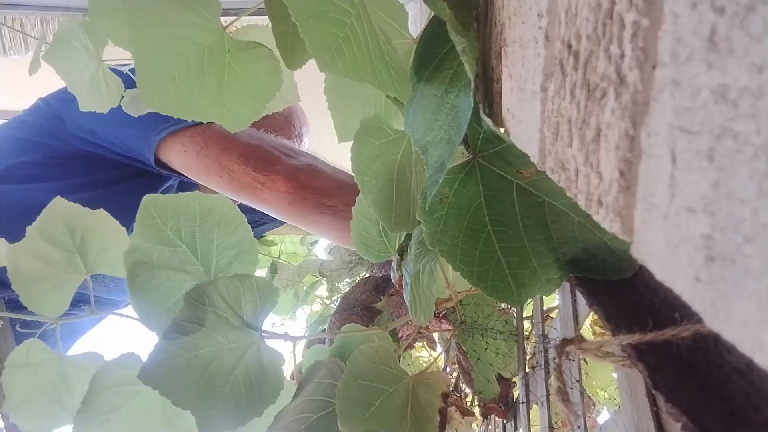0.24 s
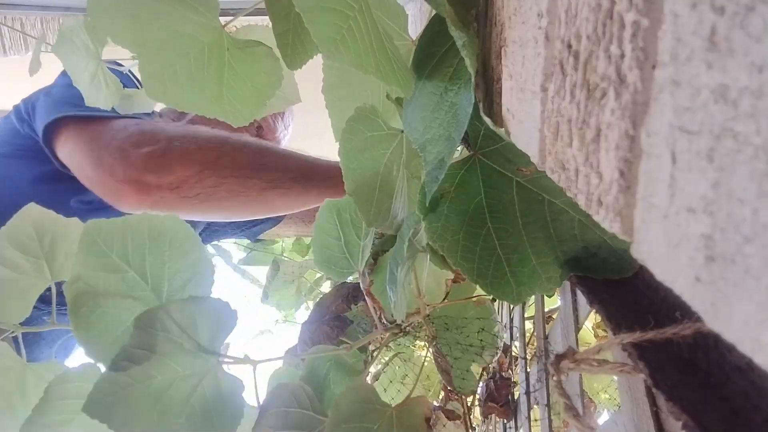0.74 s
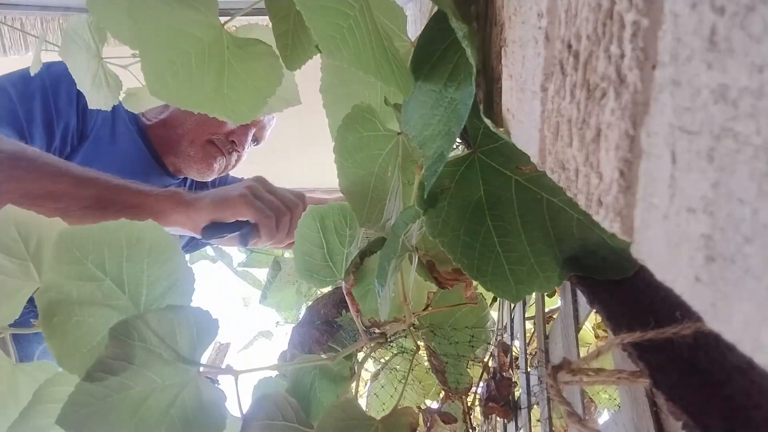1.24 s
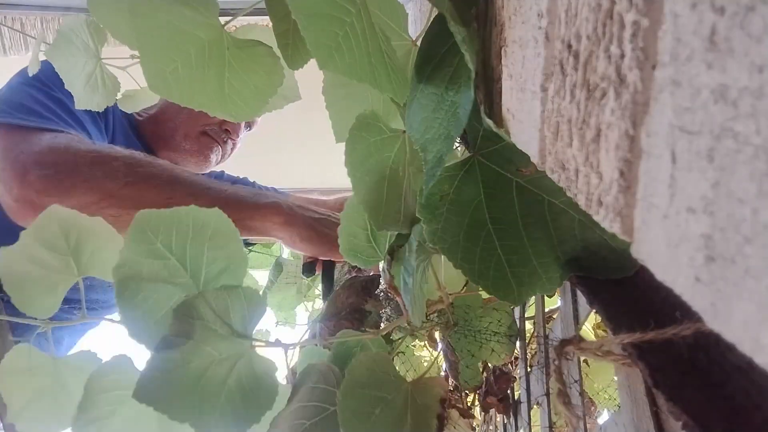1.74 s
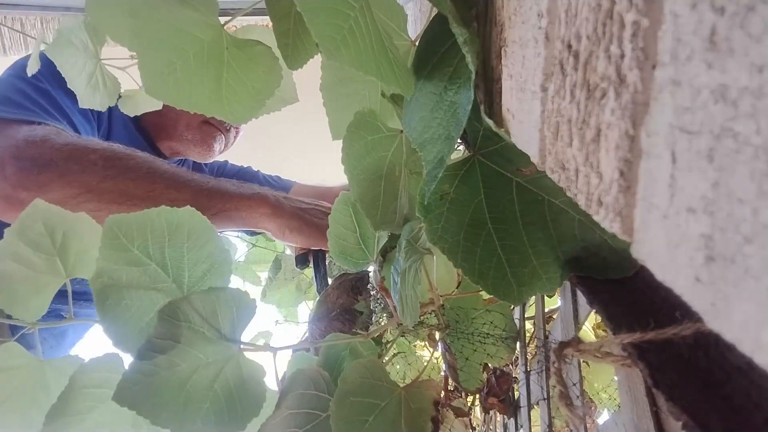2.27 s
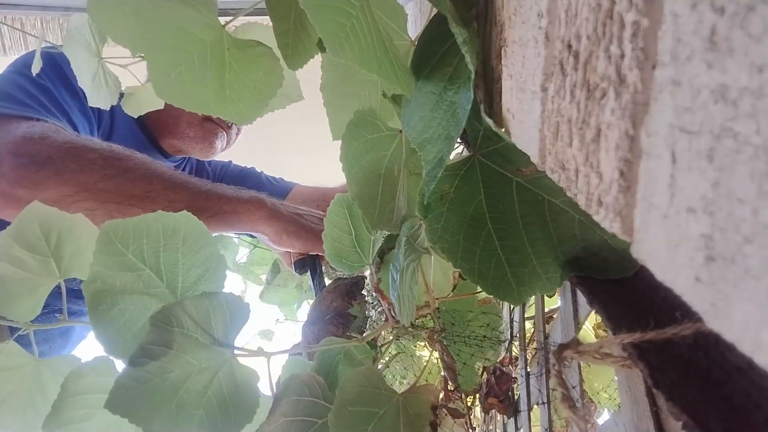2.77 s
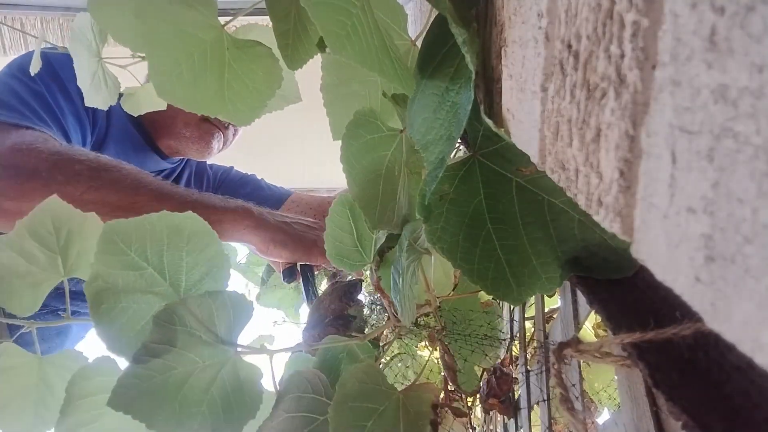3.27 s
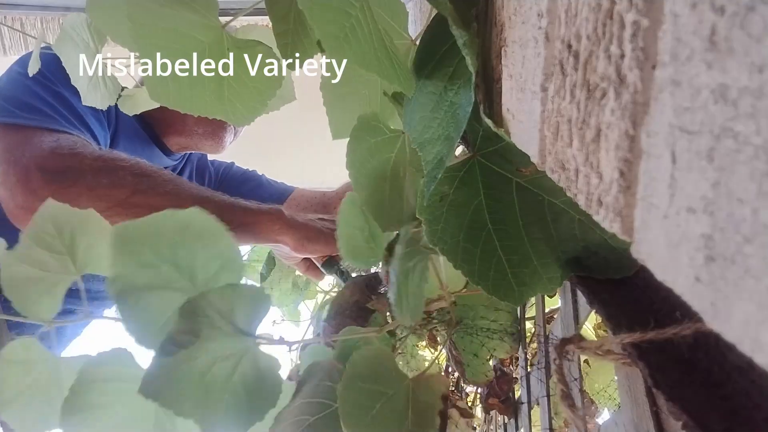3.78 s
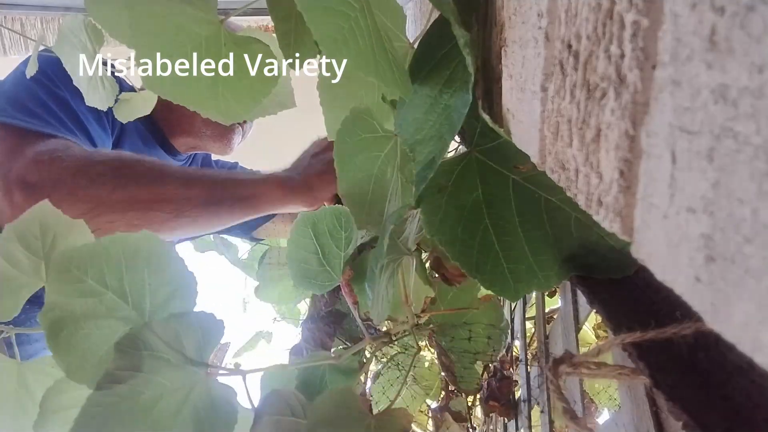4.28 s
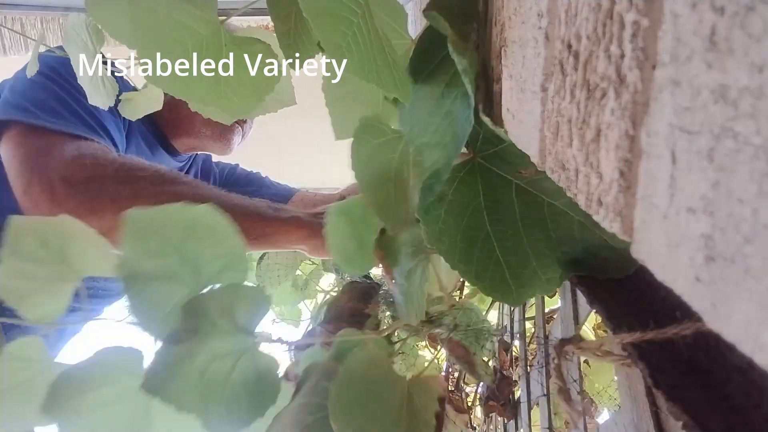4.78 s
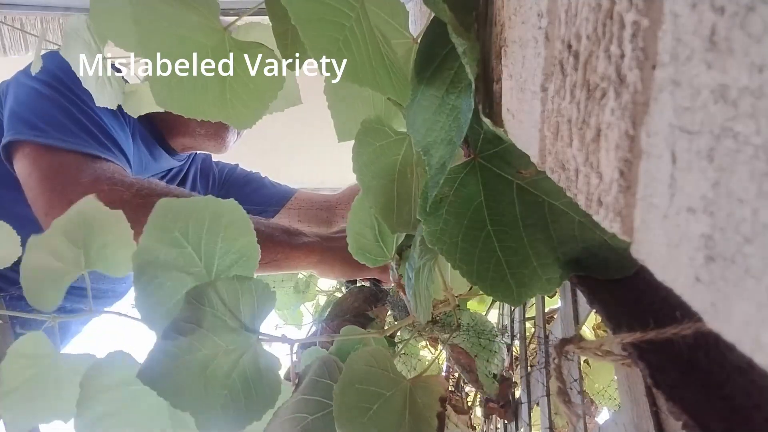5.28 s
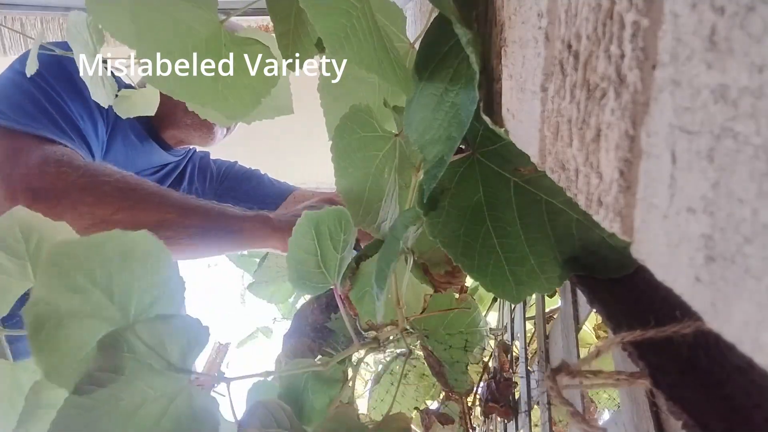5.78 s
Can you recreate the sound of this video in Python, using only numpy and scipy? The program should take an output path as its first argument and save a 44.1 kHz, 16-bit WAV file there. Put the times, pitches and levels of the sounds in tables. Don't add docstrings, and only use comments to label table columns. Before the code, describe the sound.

One sharp, crunchy snip of hand shears through a vine stem up close, then leaves rustle and twigs knock increasingly as hands push through.

```python
import sys
import numpy as np
from scipy import signal
from scipy.fft import rfft, irfft
from scipy.io import wavfile
from scipy.ndimage import uniform_filter1d

SR = 44100
rng = np.random.default_rng(int(sys.argv[2]) if len(sys.argv) > 2 else 0)


def master_out(mix):
    frames = np.transpose(np.atleast_2d(mix))
    ceiling = np.clip(frames, -1, 1)
    pcm = np.round(ceiling * 32767).astype(np.int16)
    wavfile.write(sys.argv[1], SR, pcm)


def invert_db(level):
    return 10 ** (np.asarray(level, dtype=float) / 20)


N = 265570
T = np.arange(N) / SR
HZ = np.fft.rfftfreq(N, 1 / SR) + 1
SPLIT_HZ = 7660

# frequency in Hz, density in dB per Hz.
LEAF = [(1500, -45), (2400, -16), (3100, -8), (4100, -7), (5200, -8.5), (7300, -7), (10500, -3),
        (13000, -2.5), (14300, -2)]
# frequency in Hz, density in dB per Hz.
CANE = [(300, -4.5), (520, -5.5), (750, 0.5), (1400, -3), (2300, -2), (3200, -10), (4200, -13), (5500, -50)]


def unit(x):
    return x / np.sqrt(np.mean(x ** 2))


def curve(s, db, rise_ms, fall_ms):
    late_ms = 1000 * (T - s[:, None])
    rise_ms, fall_ms = np.maximum(rise_ms, 2)[:, None], np.maximum(fall_ms, 2)[:, None]
    span_ms = np.where(late_ms < 0, -rise_ms, fall_ms)
    stroke_db = db[:, None] - 20 * late_ms / span_ms
    return np.sqrt(np.sum(invert_db(2 * stroke_db), axis=0))


def over_hz(rows):
    hz, value = np.transpose(rows)
    return np.interp(np.log(HZ), np.log(hz), value)


def ports(gain, grain_db=0., lean_db=0., likeness=None):
    # frequency in Hz, left-right likeness from 0 to 1.
    near_likeness = [(25, 0.1), (60, 1), (250, 0.82), (600, 1), (1200, 0.2), (3000, 0.01), (14000, 0)]
    like = np.clip(over_hz(near_likeness if likeness is None else likeness), 0, .99)
    grains = invert_db(np.minimum(grain_db * rng.exponential(size=N), 17))
    a, b = rfft(rng.standard_normal((2, N)) * grains)
    mid, side = a * np.sqrt(1 + like), b * np.sqrt(1 - like)
    left = (mid + side) * invert_db(lean_db / 2)
    right = (mid - side) * invert_db(-lean_db / 2)
    return unit(irfft(np.array([left, right]) * gain, N))


def walk(rate):
    k = int(SR / rate)
    held = np.repeat(rng.standard_normal(N // k + 1), k)
    return uniform_filter1d(uniform_filter1d(held, k), k)[:N]


def fade(t, t60, rise_s):
    t = np.maximum(t, 0)
    return (1 - np.exp(-t / rise_s)) * np.exp(-np.log(1000) * t / max(t60, .005))


def ring(t, hz, t60, phase=0.):
    return fade(t, t60, 0.24 / hz) * np.sin(2 * np.pi * hz * t + phase)


def sides(pan_db):
    return invert_db(np.array([[pan_db], [-pan_db]]) / 2)


def after(s):
    return slice(int(s * SR), int(s * SR) + SR // 2)


def garden():
    # frequency in Hz, density in dB per Hz.
    traffic = [(15, -35), (30, -14.5), (70, -4.5), (105, -6), (150, -12), (200, -19), (330, -19.5),
               (575, -20.5)]
    # frequency in Hz, density in dB per Hz.
    air_hiss = [(960, -31), (1200, -28), (1500, -34), (2300, -35.5), (2900, -39.5), (4700, -46),
                (10400, -41), (14300, -42.5)]
    # frequency in Hz, left-right likeness from 0 to 1.
    far_likeness = [(30, .55), (60, .91), (115, .98), (200, .86), (330, .93), (520, .78), (750, .1),
                    (1400, 0)]
    # frequency in Hz, width in Hz, level in dB.
    drone = [(119, 13, -59), (228.4, 12, -69.5), (278.8, 6, -72.5), (361.3, 14, -71), (479, 9, -74),
             (559.5, 9, -75.5)]
    air_db, patch_db, patch_rate_hz = -53, 1.6, 9

    whole = rfft(ports(invert_db(over_hz(traffic + air_hiss)), likeness=far_likeness))
    band = np.clip(np.floor(2 * np.log2(HZ / 500)), -1, 9)
    air = np.zeros((2, N))
    for k in range(-1, 10):
        flicker = invert_db(patch_db * (k >= 0) * walk(patch_rate_hz))
        air += flicker * irfft(whole * (band == k), N)
    lines = np.zeros((2, N))
    for hz, width, db in drone:
        resonance = 1 / (1 + (2 * (HZ - hz) / width) ** 2)
        lines += invert_db(db + 2.9 * walk(6.4)) * ports(resonance, likeness=far_likeness)
    return invert_db(air_db + 1.2 * walk(1.36)) * air + lines


def leaves():
    # peak time in seconds, level in dB,
    # rise over 20 dB in ms, fall over 20 dB in ms.
    brushes = [(.004, -57, 12, 160), (.43, -59, 160, 140), (2.45, -68, 30, 60), (2.54, -66, 25, 40),
               (2.67, -65, 80, 60), (3.04, -57, 30, 150), (3.3, -66, 300, 300), (3.455, -51, 25, 80),
               (.78, -61, 45, 220), (.925, -58, 22, 110), (1.27, -62, 250, 330), (1.79, -51, 70, 100),
               (1.95, -59, 300, 200), (2.06, -60, 150, 200)]
    # peak time in seconds, level in dB,
    # rise over 20 dB in ms, fall over 20 dB in ms, weight of cane in dB.
    strokes = [(2.76, -65.5, 62, 100, -4.5), (2.812, -55, 30, 91, -9.5), (3.4, -59, 40, 150, -13),
               (3.53, -56, 248, 200, -16), (3.65, -48, 118, 130, -11.5), (3.71, -55.5, 100, 200, -24),
               (3.822, -48.5, 40, 193, -13), (3.887, -50.5, 25, 116, -10), (4.142, -47, 322, 127, -12),
               (4.218, -42.5, 111, 49, -14.5), (4.329, -47, 200, 101, -11.5), (4.412, -42.5, 25, 112, -17),
               (4.447, -46, 80, 160, -17), (4.686, -58, 22, 45, -19), (4.53, -56, 60, 213, -12),
               (4.79, -56.5, 88, 99, -6.5), (4.845, -49, 60, 150, -16), (4.88, -46.5, 60, 150, -10),
               (4.94, -44.5, 100, 150, -15), (5.008, -43, 50, 100, -24), (5.072, -50, 40, 89, -24),
               (5.14, -67.5, 57, 190, -14), (5.228, -46.5, 64, 10, -9), (5.255, -59, 22, 60, -17),
               (5.31, -57, 202, 180, -7.5), (5.408, -51, 22, 100, -8.5), (5.45, -45, 31, 228, -9.5),
               (5.62, -64, 60, 150, -31), (5.71, -52, 137, 103.5, -11), (5.765, -53.5, 42, 72, -8.5),
               (5.805, -55.5, 61, 150, -17), (5.89, -64, 62, 150, 4), (5.918, -60, 19, 60, -20),
               (5.963, -57, 28, 57, -11), (6.0, -58, 60, 100, -14)]
    # frequency in Hz, density in dB per Hz.
    creak = [(100, -33), (230, -26), (380, 12.5), (520, -3), (900, -8.5)]
    brush_weight_db, hairs_db, veins_db, creak_db = -12, -3, -9.5, 2
    coarse_db, coarse_follows_weight = -2.5, 0.25
    cane_linger, canes_move_s = 3.14, 3

    rows = [(*row, brush_weight_db) for row in brushes] + strokes
    s, db, rise_ms, fall_ms, weight_db = np.transpose(rows)
    fine = curve(s, db, rise_ms, fall_ms)
    coarse = curve(s, db + coarse_db + coarse_follows_weight * weight_db, rise_ms, fall_ms)
    swish = curve(s, db + weight_db, rise_ms, cane_linger * fall_ms)

    slips = 1.7 * walk(35)
    leaf, cane = invert_db(over_hz(LEAF)), invert_db(over_hz(CANE))
    upper = 1 / (1 + (SPLIT_HZ / HZ) ** 8)
    hairs = fine * invert_db(hairs_db + slips + 1.8 * walk(130)) * ports(leaf * upper, grain_db=-1.0)
    veins = coarse * invert_db(veins_db + slips + 0.75 * walk(100)) * ports(leaf * (1 - upper), grain_db=7.5)
    dull = swish * invert_db(slips + 2.15 * walk(60)) * ports(cane, grain_db=6.0)
    frame = (T > canes_move_s) * invert_db(creak_db) * swish * ports(invert_db(over_hz(creak)))
    return invert_db(7.5) * (hairs + veins + dull) + crackle(fine, coarse, swish) + frame


def crackle(fine, coarse, swish, count=1500):
    out, t = np.zeros((2, N + 600)), np.arange(600) / SR
    for when, pitch, size, side in rng.uniform(0, 1, (count, 4)):
        i, hz = int(when * N), 700 * 18 ** pitch
        movement = swish if hz < 3000 else coarse if hz < SPLIT_HZ else fine
        strength = movement[i] * invert_db(-2.4 * np.log(1 - .97 * size))
        out[:, i:i + 600] += strength * sides(12 * (side - .5)) * ring(t, hz, 0.0083 + 9 / hz)
    return out[:, :N]


def flicks():
    # start in seconds, peak in dB, left minus right in dB.
    leaf_ticks = [(0.195, -49.5, -5), (0.753, -48, 2), (.9272, -62, 2), (1.293, -46, -8),
                  (1.3977, -42.5, -4), (1.476, -47, -3), (1.698, -47, 3), (1.735, -46, -8),
                  (1.867, -39, -6), (2.448, -51, -2), (2.5263, -53, 1), (3.076, -46, -3), (3.104, -49, -4),
                  (3.2417, -49, -6), (3.443, -62, -3), (3.7722, -43, -15), (4.78, -58, -3), (3.454, -46, 3),
                  (3.6186, -48, 2), (3.8241, -41, -2), (3.9858, -50, 0), (4.2068, -37, 0),
                  (4.4043, -43, 1.5), (4.7575, -53, 0), (4.8343, -46, 2), (4.8762, -42, 3), (5, -38, -3),
                  (5.1431, -49, -2), (5.2065, -43, 0), (5.221, -37, -2), (5.2858, -57, 0),
                  (5.405, -48, 1.5), (5.444, -36, -1.5), (5.4514, -43, -2), (5.6949, -47, -6),
                  (5.9144, -48, 1), (5.9618, -43, -2), (2.5383, -53, 0), (3.033, -49, 2)]
    # start in seconds, peak in dB, twig mode in Hz, left minus right in dB.
    edge_flicks = [(0.46, -51, 2560, 0), (2.803, -45, 790, -4), (3.6512, -41.5, 1380, -2),
                   (3.774, -38.5, 1380, 0), (3.818, -50, 2250, -9), (3.8815, -46, 2400, -16),
                   (3.895, -38, 1276, -5), (4.2244, -44, 965, 1), (4.4037, -39, 1430, -3),
                   (4.4444, -39, 2020, 3), (4.7725, -45.5, 2760, -7), (4.869, -38.5, 1100, 2),
                   (5.001, -44, 1420, 6), (5.4482, -32.5, 1510, -8), (5.4824, -38.5, 870, 5),
                   (5.755, -36.5, 1530, 4), (5.8365, -43.5, 735, -7), (5.9507, -38, 1374, -3)]
    # start in seconds, peak in dB, twig mode in Hz,
    # left minus right in dB.
    twig_knocks = [(0.41, -53, 1010, 12), (2.3298, -48.5, 2250, -1), (2.5383, -52.5, 1805, 5),
                   (3.0338, -47, 1940, -2), (3.3726, -47.5, 880, -2), (3.3985, -45, 750, -3),
                   (3.4178, -52, 1890, -1), (4.209, -38, 1220, -5), (4.2128, -39, 994, 1),
                   (4.5473, -46, 1070, -4), (5.224, -36.5, 1120, -3), (5.4445, -34.5, 700, -1),
                   (5.468, -40, 2060, -10), (5.5294, -42, 820, 2), (5.561, -43, 1240, 5),
                   (5.7116, -42, 886, 8)]
    flick_mix_db = -1, -16.5, -6
    knock_mix_db = 3.5, -11, -17
    tick_t60_s, flick_t60_s = 0.018, 0.088

    bright = ports(invert_db(over_hz(LEAF)), grain_db=1.0)
    dull = ports(invert_db(over_hz(CANE)), grain_db=4.0)
    out = np.zeros((2, N))
    for s, db, pan_db in leaf_ticks:
        part = after(s)
        out[:, part] += invert_db(db + 2.5) * sides(pan_db) * fade(T[part] - s, tick_t60_s, .0006) * bright[:, part]

    rows = [(*row, *flick_mix_db) for row in edge_flicks] + [(*row, *knock_mix_db) for row in twig_knocks]
    turns = rng.uniform(0, 2 * np.pi, (len(rows), 2))
    for (s, db, hz, pan_db, twig_db, cane_db, edge_db), turn in zip(rows, turns):
        part = after(s)
        t = T[part] - s
        shape = fade(t, flick_t60_s, 0.002) + 0.81 * fade(t, 0.049, 0.00039)
        burst = shape * (invert_db(edge_db) * bright[:, part] + invert_db(cane_db) * dull[:, part])
        twig = []
        for p in (turn[0], turn[0] + 0.21 * turn[1]):
            mode = ring(t, hz, 0.045, p)
            above = 0.3 * ring(t, 1.3 * hz, 0.035, 2 * p)
            below = 0.4 * ring(t, 0.9 * hz, 0.045, 3 * p)
            twig.append(mode + above + below)
        out[:, part] += invert_db(db) * sides(pan_db) * (burst + invert_db(twig_db - 5.5) * np.array(twig))
    return out


def cut():
    # peak time in seconds, level in dB,
    # rise over 20 dB in ms, fall over 20 dB in ms.
    crunches = [
        (.268, -46, 3, 90),
        (.2805, -29, 6, 25),
        (.2865, -15.5, 6, 13),
        (.299, -28, 15, 24),
        (.32, -41, 30, 45),
        (.35, -52, 40, 45),
    ]
    # frequency in Hz, density in dB per Hz.
    crunch_spectrum = [(300, -45), (858, -17), (1220, -10), (1420, -16), (1590, -6), (1830, -16),
                       (2020, -11), (3600, -19), (6170, -26.5), (14300, -19)]
    # frequency in Hz, left minus right in dB.
    crunch_lean = [(60, 22), (110, -16), (200, -27.5), (380, 16), (690, 12.5), (1280, -2), (2360, 0.5),
                   (4360, -11), (8040, -11), (14800, 6)]
    # start in seconds, level in dB, right port lag in ms, left minus right in dB.
    snaps = [
        (0.278, -33, 0.45, -13),
        (0.2839, -15.5, 0.11, -2.5),
        (0.2854, -22.5, 0.18, -3.5),
        (.2865, -26.5, 0.16, 7),
        (0.2882, -28.5, 0.23, -10),
        (0.2919, -32.5, 0.33, -18),
    ]
    # frequency in Hz, level in dB, T60 in seconds, left minus right in dB.
    stem = (1216, -4, .017, 11)
    # frequency in Hz, level in dB, T60 in seconds, left minus right in dB.
    shears = [(331, -18.5, 0.079, -2), (549, -16, 0.084, 5), (1380, -8, 0.024, 4), (2690, -15, 0.03, -1),
              (1630, -4, 0.038, -4), (2020, -10, 0.039, -4), (2505, -8.5, 0.05, -1),
              (3300, -6.5, 0.026, -5.5), (4100, -6, 0.02, -14), (6770, -20, 0.037, -12),
              (10480, -4, 0.037, 6), (11620, -9.5, 0.02, 22), (13460, -6, 0.028, 5)]

    noise = ports(invert_db(over_hz(crunch_spectrum)), grain_db=-2.0, lean_db=over_hz(crunch_lean))
    out = curve(*np.transpose(crunches)) * noise
    for s, db, lag_ms, pan_db in snaps:
        part = after(s)
        t = T[part] - s - np.array([[0], [lag_ms / 1000]])
        force_db = 1.2 * rng.standard_normal(len(shears) + 1)
        for (hz, mode_db, t60, lean_db), extra_db in zip([stem, *shears], force_db):
            out[:, part] -= invert_db(db + mode_db + extra_db) * sides(pan_db + lean_db) * ring(t, hz, t60)
    return out


def trellis():
    # start in seconds, level in dB, frequency in Hz, T60 in seconds.
    thuds = [
        (0.297, -39, 101, 0.38),
        (2.57, -44, 69.5, .3),
        (2.763, -41.5, 81.5, 0.21),
        (2.77, -38, 42, .3),
        (0.313, -41, 420, 0.059),
        (2.949, -47, 111, 0.039),
        (4.2233, -32, 190, 0.027),
        (5.448, -44, 120, 0.26),
    ]
    return sum(invert_db(db) * ring(T - s, hz, t60) for s, db, hz, t60 in thuds)


def taps():
    # start in seconds, peak in dB, frequency in Hz, T60 in seconds.
    stalk_taps = [(2.3355, -62, 4250, 0.025), (2.539, -65, 3400, .03), (2.541, -61, 5500, 0.027),
                  (2.544, -60, 1600, .025), (2.803, -55.5, 3500, .03), (2.818, -56.5, 4100, .04),
                  (2.8195, -56, 2220, .03), (2.8665, -61, 1890, .02), (2.914, -67, 2010, .02),
                  (3.029, -60, 1710, .03), (3.031, -61, 2600, .04), (3.037, -62.5, 3300, .04),
                  (3.372, -51, 1300, .015), (3.035, -62, 4300, .04), (3.076, -59.5, 3900, 0.036),
                  (3.102, -62, 7400, 0.046), (3.378, -49, 1490, .02), (3.3805, -54, 2100, .02),
                  (3.411, -51, 1700, .015), (3.4157, -48, 1300, .015), (3.421, -54, 1500, .015),
                  (3.4265, -56, 1600, .015), (3.49, -60, 1700, .015), (3.646, -44, 1010, .02),
                  (3.657, -53, 3570, .03), (3.883, -39, 11300, .02), (3.922, -46, 1250, .03),
                  (4.2095, -38, 2270, 0.011), (4.22, -42, 1520, 0.022), (4.878, -44, 11400, .015),
                  (4.926, -47, 1500, .02), (4.945, -48, 9500, .03), (5.2222, -44.5, 2450, .03),
                  (5.233, -56, 2270, 0.021), (5.251, -48, 1050, .03), (5.4565, -33, 2190, .03),
                  (5.4515, -38, 745, 0.024), (5.453, -41, 1470, .03), (5.46, -38, 590, 0.035),
                  (5.697, -47, 3220, .015), (5.719, -44, 636, .03), (5.765, -49, 1520, .025),
                  (5.892, -44.5, 900, 0.028), (5.958, -50, 2140, 0.023), (5.964, -43, 794, .03),
                  (5.963, -46, 7200, 0.013), (5.562, -45, 2010, .02), (5.566, -41, 760, .03),
                  (5.4585, -39, 2550, 0.017)]
    out = np.zeros((2, N))
    for (s, db, hz, t60), (turn, side) in zip(stalk_taps, rng.uniform(-1.07, 1, (len(stalk_taps), 2))):
        t = T[after(s)] - s
        second = 0.72 * ring(t, (1.12 + 0.032 * turn) * hz, t60, np.pi * turn)
        out[:, after(s)] += invert_db(db) * sides(4 * side) * (ring(t, hz, t60) + second)
    return out


def scene():
    far = garden()
    near = leaves() + flicks() + cut() + taps()
    wall = np.roll(near[::-1], int(.0031 * SR), axis=1)
    return near + invert_db(-19) * wall + trellis() + far


def roll_off(x):
    return signal.sosfilt(signal.butter(12, 14900, fs=SR, output="sos"), x)


def record(dry):
    bass_cut_hz, top_hz = 87, 14110
    capsule = signal.butter(2, bass_cut_hz, "high", fs=SR, output="sos")
    treble_cut = signal.ellip(8, .2, 45, top_hz, fs=SR, output="sos")
    rounded = np.tanh(1.5 * dry) / 1.5
    mix = signal.sosfilt(np.vstack([capsule, treble_cut]), rounded)
    return roll_off(mix)


dry = scene()
out = record(dry)
master_out(out)
```